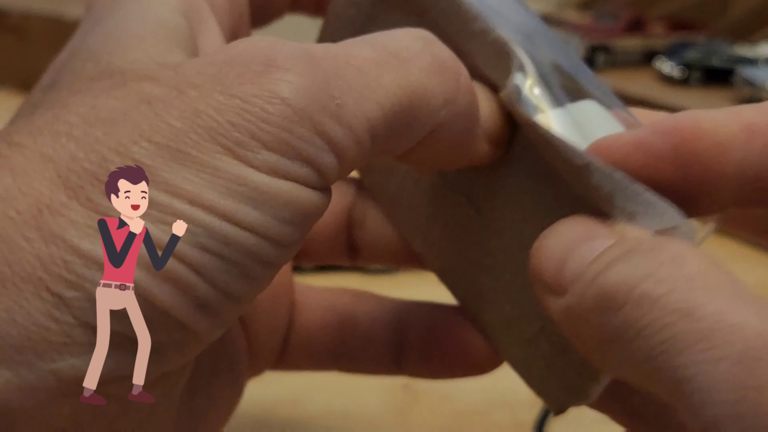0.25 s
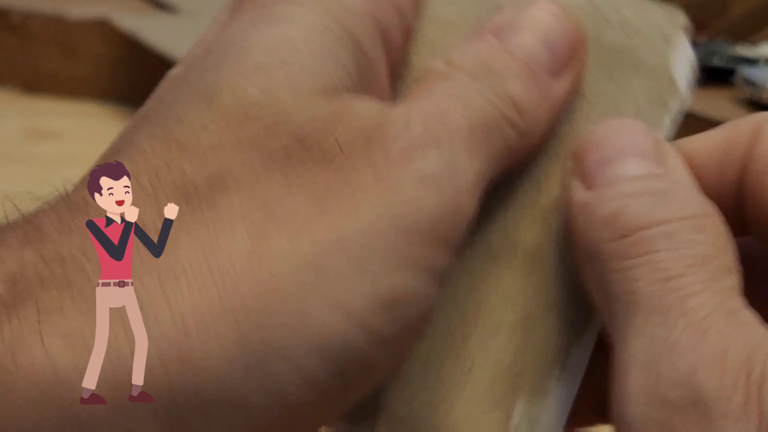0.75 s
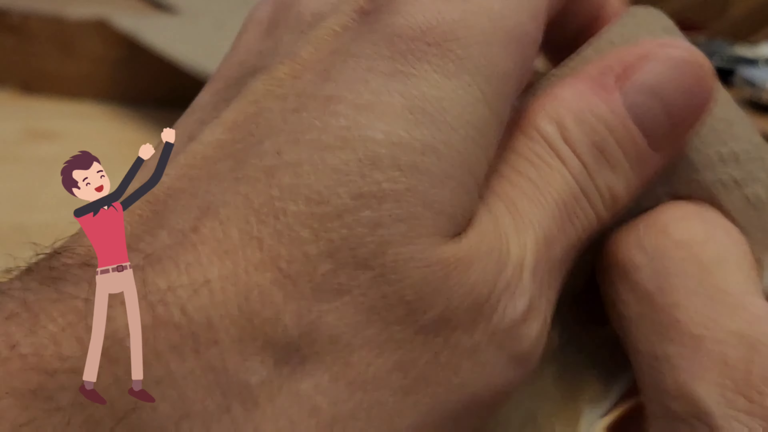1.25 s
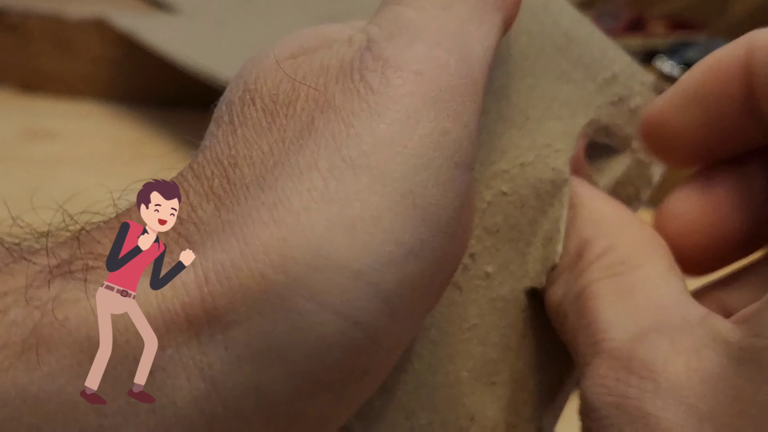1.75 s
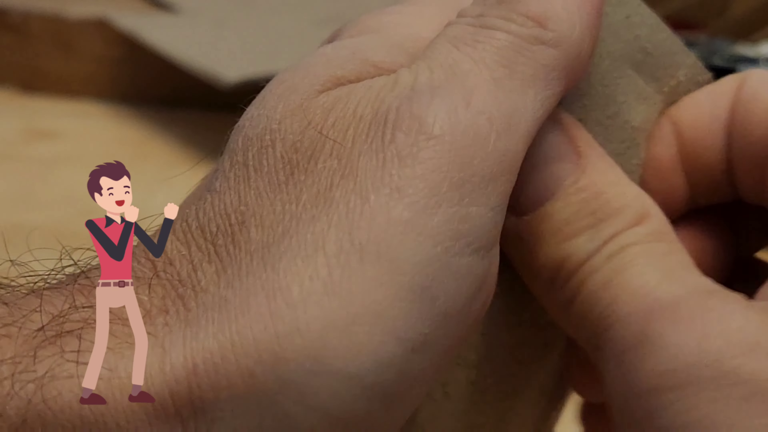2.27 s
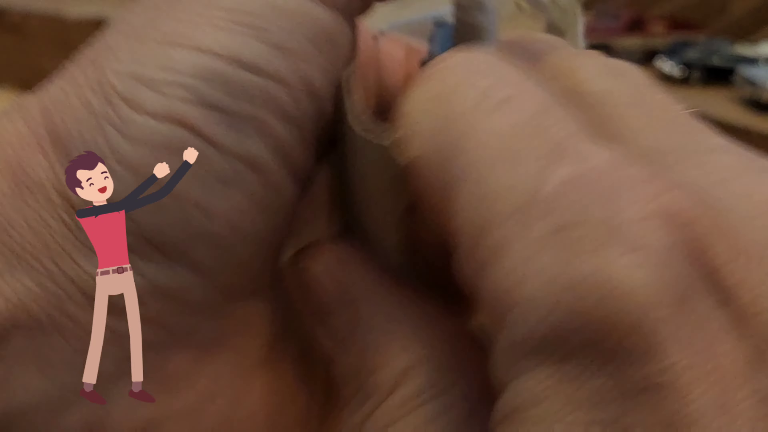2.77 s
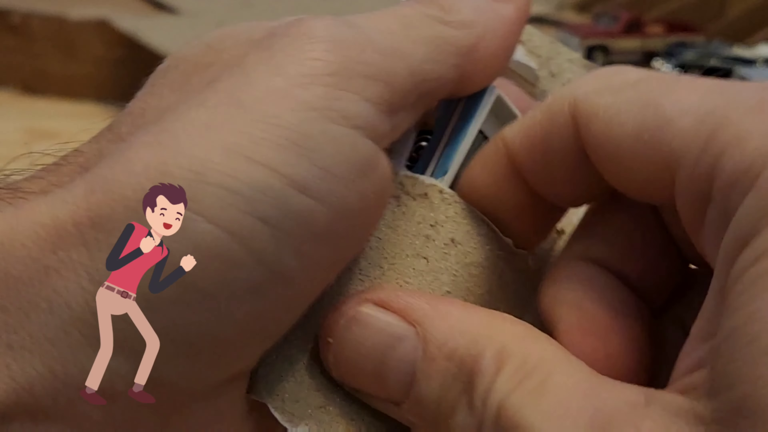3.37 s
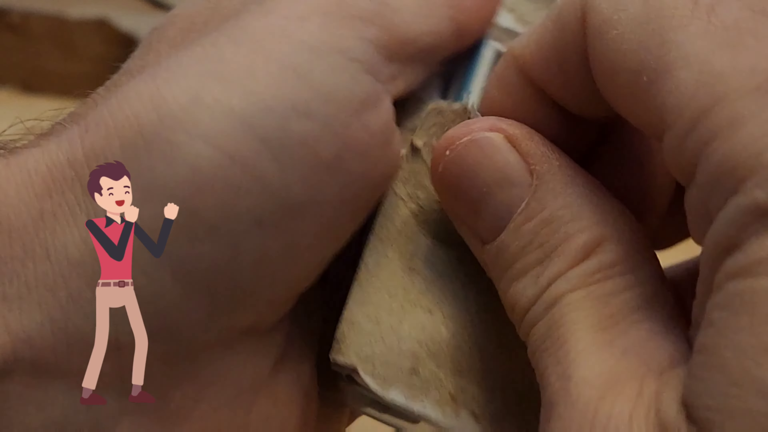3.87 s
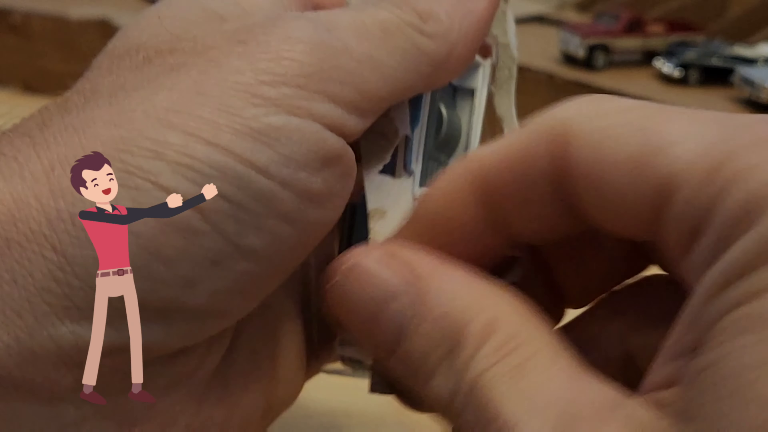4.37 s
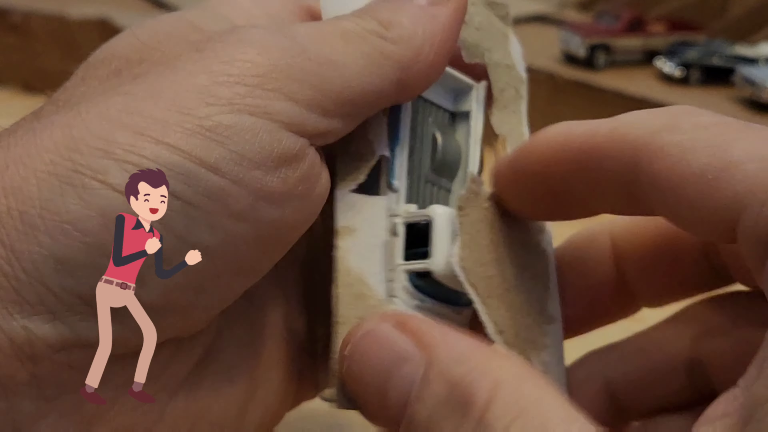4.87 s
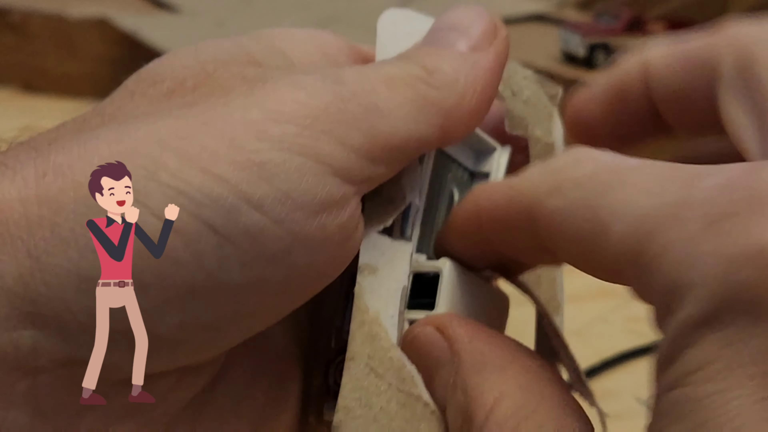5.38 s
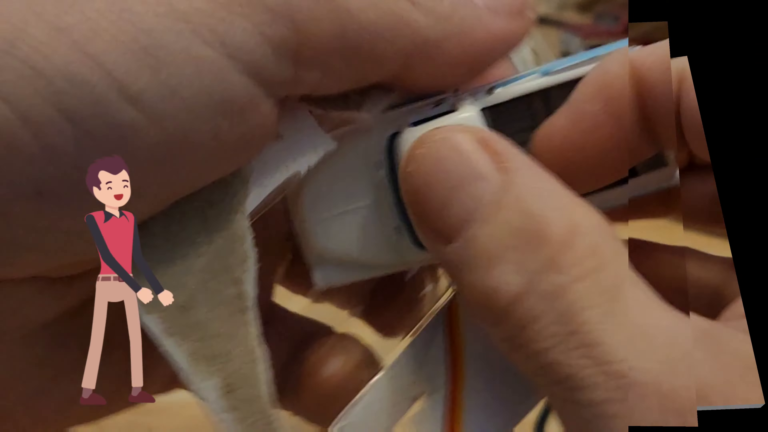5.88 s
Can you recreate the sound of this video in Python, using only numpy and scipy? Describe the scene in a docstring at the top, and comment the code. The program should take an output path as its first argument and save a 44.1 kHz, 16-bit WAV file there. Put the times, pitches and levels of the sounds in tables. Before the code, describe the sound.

Close stereo sound in a small quiet room, slightly left, over very faint ventilation rumble. Fingers rub card with dry crackle, and a sharp plastic snap comes at 0.24 s. Around 0.5-0.65 s a short rip, small snaps and soft hand thuds bunch together, followed by light fibre crackle. A loud snap at 1.05 s leaves a faint ringing; a cluster with a thud follows at 1.2 s, then a bright, hard rip at 1.3-1.4 s. Strong single snaps come near 1.5, 1.8 and 2.04 s, and the loudest group at 2.35-2.45 s. A short tick at 2.8 s precedes a quieter gap. From 3.25 s smaller snaps and bright papery rips resume, with a longer tear near 3.9 s and a strong one around 4.6 s. Afterwards, sparse light crackles and weak clicks continue until a last small flurry at 6.0-6.1 s. Snaps leave short room tails.

```python
"""Tearing open a blister pack

Hands tear the card backing off a plastic blister, close to a two-port microphone and nearer its left port.
The stiff shell buckles with sharp snaps: each sets decaying modes ringing and adds a burst of noise.
Card fibres rip and fingers rub in a dense crackle of shaped noise and short ticks; hands bump in low thuds.
A small room answers with decaying noise tails, and a low hum of ventilation, filtered noise, lies under it.
"""
import sys
import numpy as np
from scipy import signal
from scipy.fft import rfft, irfft, next_fast_len
from scipy.io import wavfile
from scipy.ndimage import uniform_filter1d, map_coordinates

SR = 44100
rng = np.random.default_rng(int(sys.argv[2]) if len(sys.argv) > 2 else 0)


def to_wav(s):
    """Save 16-bit WAV."""
    ch = np.atleast_2d(s).T  # columns
    pcm = np.round(np.clip(ch, -1, 1) * 32767)  # PCM
    wavfile.write(sys.argv[1], SR, pcm.astype(np.int16))


N = 270324  # samples

# snaps of the shell; the last three levels are relative to the snap's own:
# (time [s], level [dB], deep modes [dB], bright modes [dB], crack noise before its band-pass [dB])
SNAP_EVENTS = [(0.24, 1.5, -1, -5.5, -36), (0.525, -25, 13.5, 8.5, -6), (0.601, -11, -7.5, 1, -1.5),
               (0.647, -18.5, -22, 9.5, -3), (1.049, 5.5, -53, -3.5, -30), (1.187, -1, -7, 8, -2),
               (1.19, -11.5, -25, 3.5, 4.5), (1.208, -1, 1, -44, -34), (1.311, -19, -9, 20.5, 11.5),
               (1.341, -2.5, -7.5, 6.5, -6), (1.357, -11, -2.5, 12, -25), (1.512, 4, -11, -4.5, -27),
               (1.796, 4, -56, 0.5, -9.5), (1.94, -10.5, -2.5, -6, -6), (1.945, -14, 10.5, 9.5, -8),
               (2.038, 4.5, -26, -9.5, -17.5), (2.141, -38.5, -32.5, 25.5, 16),
               (2.341, -1.5, -2, -9, -29.5), (2.418, 0, -9.5, -1, -6.5), (2.423, 10, -29, -5.5, -27),
               (2.476, -26.5, -30, 12, 9), (2.811, -14, 1, -16, -9), (3.256, -20.5, -35, 7, -23),
               (3.357, -16.5, -29, 6, -16), (3.431, -6.5, -48, 8.5, -6), (3.5, -11.5, -27, 3, -5),
               (3.69, -13.5, -39, 0, -13), (3.796, -23, 1, -17, -31), (4.045, -13, -14.5, 9, -27),
               (4.567, -8.5, -48, 2.5, -17), (4.92, -33.5, -14.5, 6, -12.5), (5.116, -28, 1, 14.5, 9.5),
               (5.198, -12.5, -33, 5, 2), (5.219, -24, -20, 3, 3), (5.309, -21, -36, 9.5, 1),
               (5.408, -30, 0, -4, 5), (5.501, -22, -5, 5.5, -10), (5.593, -32, -8, 11.5, 10),
               (5.606, -29, -6, 12, -18), (5.77, -33.5, -33.5, 18, 5), (5.798, -23.5, -38, -20, 3),
               (5.968, -33, -15, -1, -13), (6.015, -15.5, -15, 10.5, 1.5), (6.069, -23.5, -2, 17.5, 2)]


def amp(db):
    """dB to gain."""
    return 10 ** (np.asarray(db) / 20)


def unit(x):
    """Scaled to rms 1."""
    return x / np.sqrt(np.mean(x ** 2) + 1e-20)


def along(points, hz):
    """Values of (Hz, value) points, interpolated on a log frequency axis."""
    f, v = np.transpose(points)
    return np.interp(np.log(hz + 1), np.log(f + 1), v)


def curves(rows):
    """One value per sample for each column after the time."""
    s, *cols = np.transpose(rows)
    return [np.interp(np.arange(N) / SR, s, c) for c in cols]


def wobble(rate):
    """A smooth random curve, rate knots a second."""
    knots = rng.standard_normal(int(N * rate / SR) + 4)
    return map_coordinates(knots, [np.arange(N) * rate / SR])


def filtered(x, response):
    """x times a complex response of frequency."""
    m = next_fast_len(N + 8192)
    return irfft(rfft(x, m) * response(np.fft.rfftfreq(m, 1 / SR)), m)[..., :N]


def pair(x, spectrum, alike, patchy_db):
    """Two raw channels given patches of changing colour, filtered and mixed to a left-right likeness, rms 1."""
    z = signal.stft(x, nperseg=256)[2]
    field = uniform_filter1d(rng.standard_normal(z.shape[1:]), size=5, axis=0)  # over frequency
    field = uniform_filter1d(field, size=12, axis=1)  # over time
    x = signal.istft(z * amp(patchy_db * unit(field)), nperseg=256)[1][:, :N]
    # the angle sets how much is common to both ports (mid) and how much opposed (side)
    turn = lambda hz: np.arccos(np.clip(along(alike, hz), -1, 1)) / 2
    mid, side = filtered(x, lambda hz: amp(along(spectrum, hz)) * [np.cos(turn(hz)), np.sin(turn(hz))])
    return unit(np.array([mid + side, mid - side]))


def hum():
    """Ventilation rumble and faint hiss: filtered noise, swelling as the hands lean on the table."""
    # colour of the air noise: (frequency [Hz], relative level [dB])
    air_colour = [(20, -14), (80, -8), (110, -2), (140, -7), (195, -4.5), (250, -18.5), (330, -9.5),
                  (400, -22), (870, -36.5), (3300, -32), (9000, -57), (16000, -48)]
    # likeness of the two ports: (frequency [Hz], correlation [-1 to 1])
    air_likeness = [(60, 0.93), (250, 0.97), (700, 0.43), (3000, 0.18)]
    # rumble under the moving hands: (time [s], level [dB])
    handling = [(0, -50), (1.2, -52.5), (2.6, -56), (4.4, -56.5), (5.1, -54.5), (6.13, -51)]
    air = pair(rng.standard_normal((2, N)), air_colour, air_likeness, patchy_db=3.0)
    return amp(curves(handling)[0]) * air


def pull():
    """Strength of fibres and of the card's body: rips, rubbing and the shudder after snaps add as powers."""
    # fingers rubbing between the rips: (time [s], fibre crackle level [dB])
    rubbing = [(0, -50.5), (0.15, -44), (0.3, -54), (0.72, -44.5), (1.0, -54), (1.45, -42.5), (1.77, -58),
               (2.65, -49.5), (3.22, -62.5), (3.45, -51), (3.85, -52.5), (4.2, -66.5), (4.5, -42.5),
               (4.88, -73.5), (5.0, -52.5), (5.65, -49), (5.92, -59.5), (6.13, -58)]
    # short rips of the card: (time [s], length [s], fibre crackle level [dB])
    rip_events = [(0.049, 0.014, -38.5), (0.424, 0.0034, -41.5), (0.558, 0.014, -32), (0.605, 0.037, -30.5),
                  (0.719, 0.0035, -39), (0.794, 0.064, -41), (0.879, 0.057, -44), (1.175, 0.014, -37.5),
                  (1.19, 0.038, -37), (1.311, 0.028, -23.5), (1.353, 0.018, -30), (1.38, 0.054, -36.5),
                  (1.612, 0.0076, -32.5), (1.895, 0.049, -36), (2.008, 0.015, -34.5), (2.163, 0.11, -42),
                  (2.314, 0.043, -42), (2.39, .025, -37.5), (2.413, 0.071, -28), (2.513, 0.044, -37.5),
                  (2.616, 0.008, -37), (2.725, 0.059, -38), (2.803, 0.0071, -25.5), (3.254, 0.025, -39.5),
                  (3.352, 0.016, -38.5), (3.466, 0.0041, -39), (3.495, 0.051, -34.5), (3.651, 0.0046, -37),
                  (3.697, 0.02, -39.5), (3.83, 0.0071, -45.5), (3.884, 0.066, -40), (3.928, 0.1, -31.5),
                  (4.365, 0.043, -39.5), (4.492, 0.014, -40), (4.606, 0.036, -30), (4.629, 0.029, -26),
                  (4.927, 0.077, -41.5), (5.042, 0.1, -45), (5.109, 0.014, -36.5), (5.191, 0.018, -31.5),
                  (5.304, 0.015, -36), (5.391, 0.029, -39), (5.578, 0.028, -42.5), (5.731, 0.013, -43),
                  (5.789, 0.01, -38), (5.841, 0.027, -43), (5.957, 0.033, -43.5), (6.009, 0.019, -34.5),
                  (6.088, 0.015, -31.5)]
    # how much the card's body sounds along with its fibres: (time [s], level over the crackle [dB])
    card_share = [(0, -2), (0.4, -7), (0.6, -2.5), (0.85, -9.5), (1.35, -0.5), (1.62, -8.5), (1.9, 4.5),
                  (2.2, -6.5), (2.47, 1.5), (2.75, -8.5), (3.05, -8.5), (3.25, 1), (3.5, -5.5), (6.13, -8)]
    rise_db_per_s, fall_db_per_s, sag_db_per_s = 661, 426, 52
    snap_near_s = .008
    shudder_db, shudder_db_per_s = -40, 168.5  # start relative to the snap, then fall

    t = np.arange(N) / SR
    fibre_power = amp(curves(rubbing)[0]) ** 2
    for s, length, db in rip_events:
        before = np.maximum(s - t, 0)
        after = np.maximum(t - s - abs(length), 0)
        strength = amp(db - rise_db_per_s * before - fall_db_per_s * after)
        snapped = min(abs(row[0] - s) for row in SNAP_EVENTS) < snap_near_s
        if snapped:  # a rip set off by a snap starts at once and sags from its start
            strength = (t > s) * strength * amp(-sag_db_per_s * abs(t - s))
        fibre_power = fibre_power + strength ** 2
    body_power = fibre_power * amp(curves(card_share)[0]) ** 2
    for s, db, *_ in SNAP_EVENTS:
        shudder = (t > s) * amp(db + shudder_db - shudder_db_per_s * abs(t - s))
        body_power = body_power + shudder ** 2
    return np.sqrt(fibre_power), np.sqrt(body_power)


def breaks(rate, spread_db, life):
    """Fibres break at random, rate a second, in random sizes; the power of each decays with time constant life."""
    sizes = amp(spread_db * np.minimum(rng.exponential(size=N), 4))
    sizes = (rng.random(N) < rate / SR) * sizes
    power = signal.lfilter([1], [1, -np.exp(-1 / (life * SR))], sizes ** 2)
    return np.sqrt(unit(power))


def ticks(count, mid_hz, cycles, spread_db):
    """Single fibres and creases letting go: a few cycles each, at its own pitch, size and spot."""
    luck, t = rng.random((count, 4)), np.arange(192) / SR
    hz = np.clip(mid_hz * np.exp(0.56 * rng.standard_normal((count, 1))), 1300, 14000)
    size = amp(-spread_db * np.log(1 - .97 * luck[:, 1:2]))  # many small, few large
    grain = size * np.sin(2 * np.pi * hz * t) * np.exp(-t * hz / cycles)
    at = (luck[:, :1] * N).astype(int) + np.arange(len(t))
    shift = np.round(5 * (luck[:, 2:3] - .5)).astype(int)  # the spot sets the lag between the ports
    lean = amp(8.9 * luck[:, 3:])  # raises the left port, lowers the right
    sides = []
    for k in (1, -1):
        where = (at + 8 + k * shift).ravel()
        sides.append(np.bincount(where, (grain * lean ** k).ravel(), N + 256)[:N])
    return unit(np.array(sides))


def rip():
    """Fibres crackle in the treble; the same jerks shake the card's body."""
    # colour of the fibres' hiss: (frequency [Hz], relative level [dB])
    fibre_colour = [(1060, -36), (1800, -13.5), (2620, -9), (3060, 0), (5290, -5), (6590, -5), (8750, -7),
                    (11500, -9.5), (15100, -14), (16000, -20)]
    # colour of the card's body: (frequency [Hz], relative level [dB])
    card_colour = [(300, -40), (600, -21), (1000, -4), (1450, -5), (1900, 1), (2450, -7.5), (3500, -23.5)]
    # change of the crackle above treble_hz: (time [s], level [dB])
    treble_level = [(0, 0.5), (1.3, -1), (2.3, -0.5), (2.8, 5), (3.6, 7), (4.2, 1), (4.7, 6.5),
                    (6.13, -1.5)]
    treble_hz = 8800

    fibre_strength, body_strength = pull()
    jerks_db = 1.6 * wobble(50)
    hiss = (0.7 + breaks(350, spread_db=3.5, life=0.0012)) * rng.standard_normal((2, N))
    knock = (0.14 + breaks(230, spread_db=1, life=0.004)) * rng.standard_normal((2, N))
    # likeness of the ports: (frequency [Hz], correlation)
    fibres = pair(hiss, fibre_colour, [(2000, 0.97), (5000, 0.04), (12000, 0.05)], patchy_db=2.0)
    card = pair(knock, card_colour, [(400, 0.48), (1000, 0.92), (2500, 0.24)], patchy_db=2.5)
    fibres = fibres + amp(-6.5) * ticks(count=1500, mid_hz=4950, cycles=2.0, spread_db=4.5)
    treble = filtered(fibres, lambda hz: 1 / (1 + (treble_hz / (hz + 1)) ** 4))
    fibres = fibres + (amp(curves(treble_level)[0]) - 1) * treble
    return amp(jerks_db) * (fibre_strength * fibres + body_strength * card)


def ring(modes, t, detune):
    """One blow sets modes off together, strengths and tuning new; each port hears them a little differently."""
    hz, db, t60 = np.transpose(modes)[:, :, None]
    luck = rng.standard_normal((3, len(modes), 1))
    decaying = amp(db + 2.5 * luck[1] - 60 * t / t60)
    swing = np.sin(2 * np.pi * hz * (1 + detune * luck[0]) * t) * decaying
    return np.array([np.sum(swing * amp(1.5 * side * luck[2]), 0) for side in (1, -1)])


def snaps():
    """The shell buckles in three jerks within some ms; each rings its modes and cracks."""
    # modes of shell and card: (frequency [Hz], relative level [dB], t60 [s])
    pack_modes = [(540, -8, .018), (650, -3, .02), (820, 0, .024), (1000, -2, .016), (1320, -1, .014),
                  (1600, -2, .013), (1890, 0, .012), (2150, -5, .008), (3050, 0, .006), (3600, 0, .006),
                  (4200, -2, .005), (4900, -3, .005), (5600, -2, .004)]
    # two panels of the shell that ring on faintly: (frequency [Hz], level [dB], t60 [s])
    lingering = [(850, -39, .3), (1540, -30, .5)]

    out, cracks = np.zeros((2, N + SR)), np.zeros((2, N + SR))
    t = np.arange(8192) / SR
    modes = np.array(pack_modes)
    group = np.digitize(modes[:, 0], [1100, 2600])  # deep, middle, bright; limits in Hz
    for s, db, deep_db, bright_db, crack_db in SNAP_EVENTS:
        levels = (deep_db, -3, bright_db)
        parts = [ring(modes[group == k], t, detune=.05) for k in range(3)]
        blow = sum(amp(level) * part / np.abs(part).max() for level, part in zip(levels, parts))
        flutter = 1 + unit(uniform_filter1d(rng.standard_normal(len(t)), size=300)) / 2
        shell_free = 1.0 < s < 1.1  # s; only then does no finger damp the panels
        blow = shell_free * flutter * ring(lingering, t, detune=.005) - blow
        blow *= 1 - np.exp(-t / 0.000087)  # the wall gives way in a fraction of a ms
        noise = rng.standard_normal((3, len(t)))
        # noise partly shared by the ports, t60 11 ms
        crack = amp(crack_db - 60 * t / 0.011) * (noise[0] + 0.87 * noise[1:])
        luck = rng.random((2, 3))
        delays = 0.00071 + np.append(0, np.cumsum(.0006 + 0.001748 * luck[0, 1:]))  # s
        # each later jerk 9 dB weaker, pushing either way
        sizes = np.append(1, amp(-9 * np.arange(1, 3)) * np.sign(luck[1, 1:] - .5))
        for delay, size in zip(delays, sizes):
            at = round((s + delay) * SR)
            out[:, at:at + len(t)] += amp(db) * size * blow
            cracks[:, at:at + len(t)] += amp(db) * size * crack
    airborne = lambda hz: (1j * hz / (480 + 1j * hz)) ** 3  # a small pack radiates little bass
    sharp = lambda hz: 1j * hz * 6000 / (7500 ** 2 - hz ** 2 + 1j * hz * 6000)  # band around 7500 Hz
    return filtered(out[:, :N], airborne) + filtered(cracks[:, :N], lambda hz: sharp(hz) ** 2)


def room(x):
    """Each frequency of the room's answer dies at its own speed; a fresh noise tail as the hands move."""
    # decay of the room: (frequency [Hz], t60 [s])
    room_decay = [(300, 0.37), (1000, 0.15), (3000, 0.23), (10000, 0.16)]
    step, gap = 8192, 350  # samples: renewal of the tail, wait before the answer
    out = np.zeros((2, N + SR))
    for start in range(0, N, step):
        hz, t, z = signal.stft(rng.standard_normal((2, SR // 3)), SR, nperseg=256)
        decay = amp(-60 * t / along(room_decay, hz)[:, None])
        tail = signal.istft(z * decay, SR, nperseg=256)[1]
        wet = signal.fftconvolve(x[None, start:start + step], tail / np.linalg.norm(tail[0]), axes=1)
        out[:, start + gap:start + gap + wet.shape[1]] += wet
    return out[:, :N]


def thuds():
    """Soft flesh on card: a low sine dying within a cycle or two, alike at both ports."""
    # hands bump pack and table: (time [s], level before decay [dB], frequency [Hz])
    bumps = [(0.51, -25, 373), (0.523, -34, 157), (0.565, -31.5, 113), (1.19, -22.5, 332),
             (3.149, -35, 227), (4.907, -35.5, 110), (5.93, -38, 97)]
    out, t = np.zeros(N + SR), np.arange(4096) / SR
    for s, db, hz in bumps:
        out[round(s * SR):][:len(t)] += amp(db) * np.sin(2 * np.pi * hz * t) * np.exp(-t * hz / 0.71)
    return out[:N]


def scene():
    """The pack sits to one side of the ports; the room returns treble weaker and bass alike to both."""
    # place of the pack before the microphone: (time [s], left over right [dB])
    place = [(0, 2.5), (1.3, 0), (2.2, 0.5), (3, 2.5), (6.13, 2)]
    port_lag = 2.17  # samples by which the right port hears later
    hits, tearing = snaps(), rip()
    lean_db = curves(place)[0] / 2
    near = (hits + tearing) * amp([lean_db, -lean_db])
    ports = np.array([[1], [-1]])  # half the lag each way
    near = filtered(near, lambda hz: np.exp(1j * np.pi * hz * port_lag / SR * ports))

    left, right = room(amp(-10) * hits.mean(0) + amp(-9.0) * tearing.mean(0))
    dull = lambda hz: 1 / (1 + 1j * hz / 4000)
    no_bass = lambda hz: 1j * hz / (900 + 1j * hz)
    mid_side = np.array([left + right, left - right]) / 2
    mid, side = filtered(mid_side, lambda hz: [dull(hz), no_bass(hz) * dull(hz)])
    return near + [mid + side, mid - side] + thuds() + hum()


def record(dry):
    """The microphone's peaks round off near full scale; almost nothing stays above the band limit."""
    top_hz = 15700
    soft = dry / (1 + np.abs(dry / .9) ** 6) ** (1 / 6)
    return filtered(soft, lambda hz: 1 / (1 + (hz / top_hz) ** 80))


dry = scene()
out = record(dry)
to_wav(out)
```